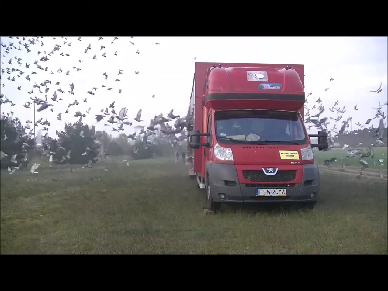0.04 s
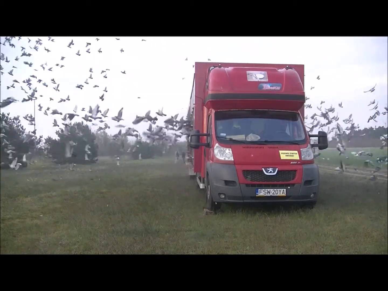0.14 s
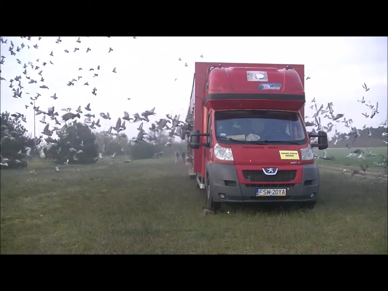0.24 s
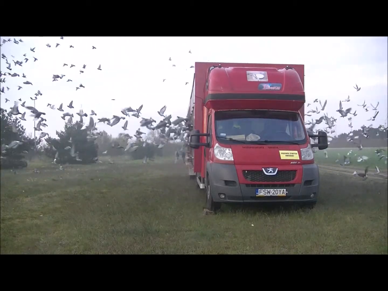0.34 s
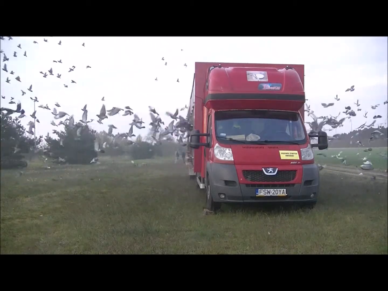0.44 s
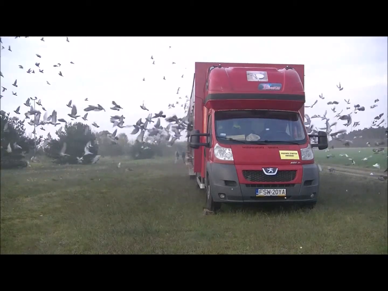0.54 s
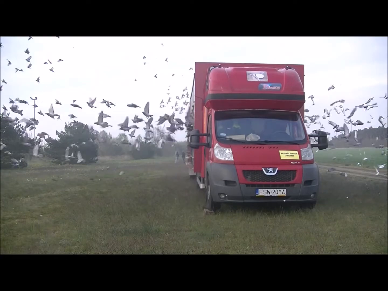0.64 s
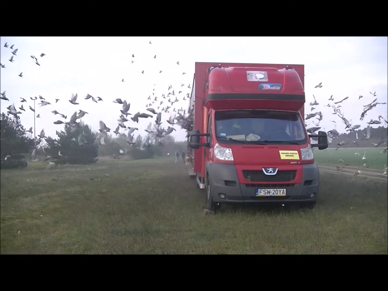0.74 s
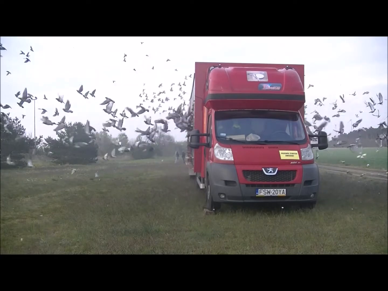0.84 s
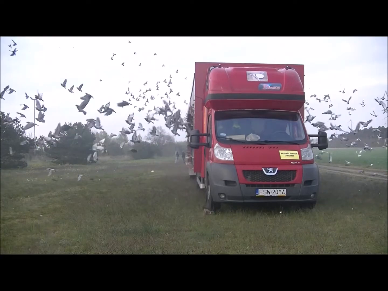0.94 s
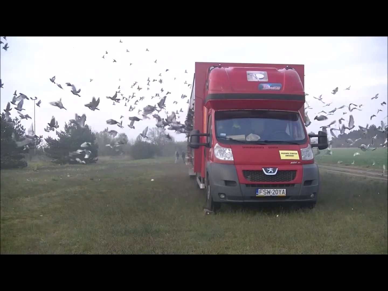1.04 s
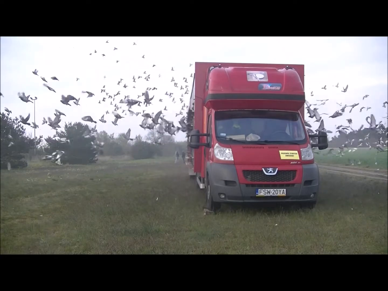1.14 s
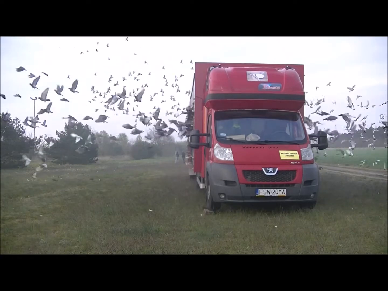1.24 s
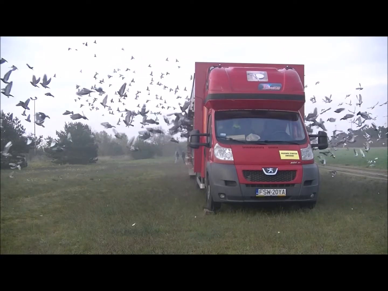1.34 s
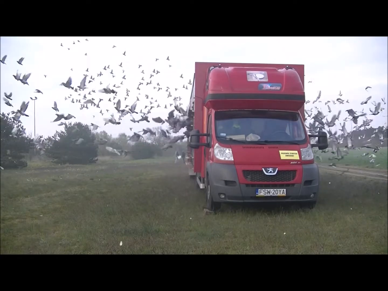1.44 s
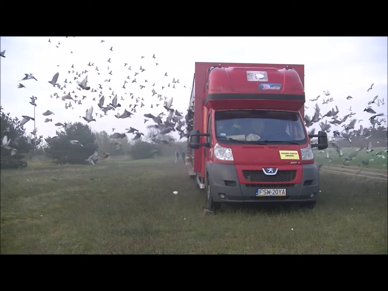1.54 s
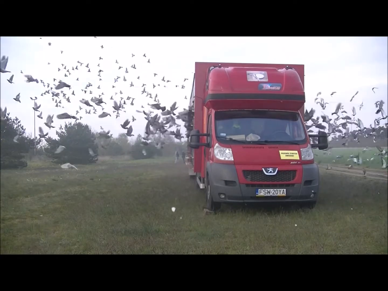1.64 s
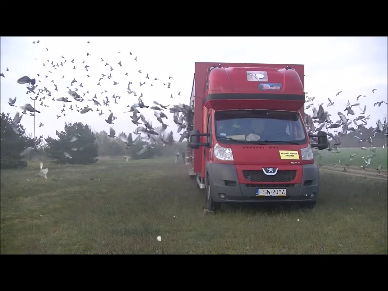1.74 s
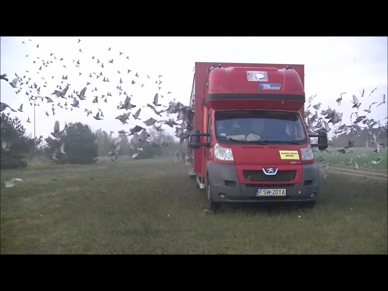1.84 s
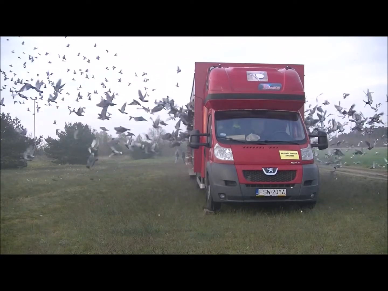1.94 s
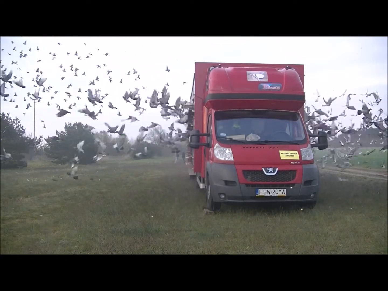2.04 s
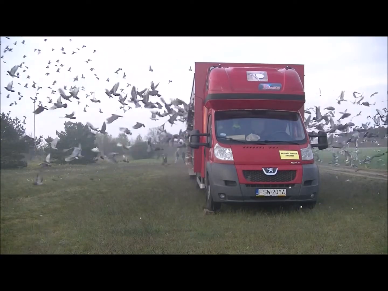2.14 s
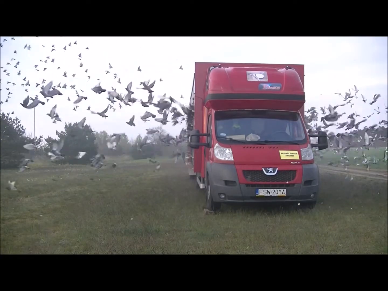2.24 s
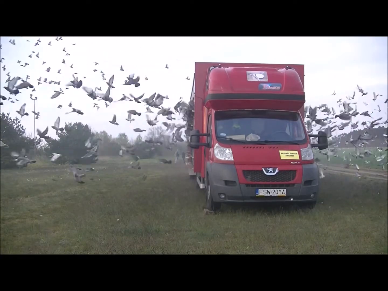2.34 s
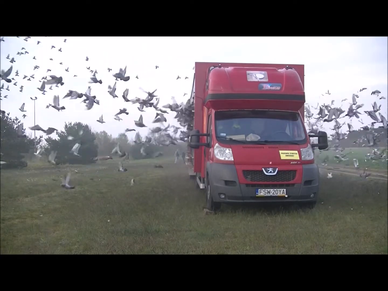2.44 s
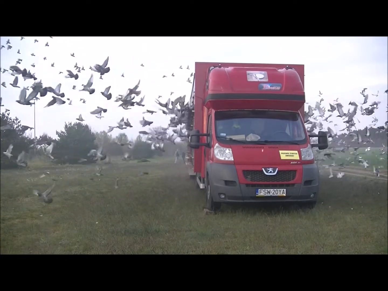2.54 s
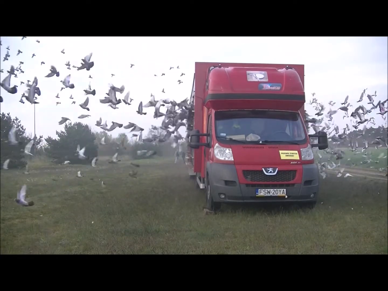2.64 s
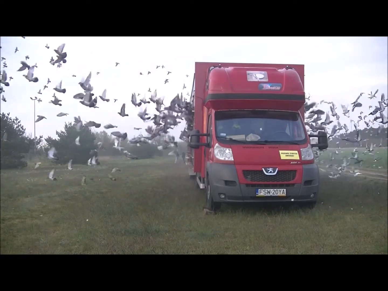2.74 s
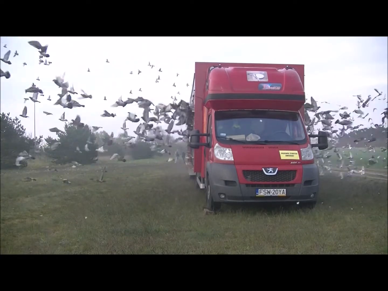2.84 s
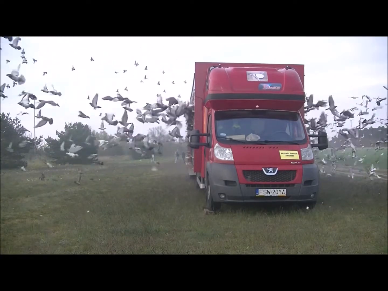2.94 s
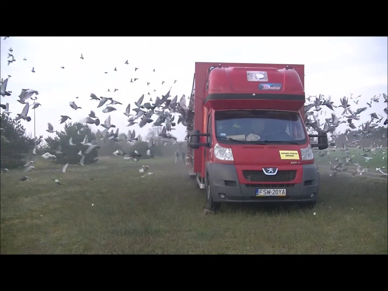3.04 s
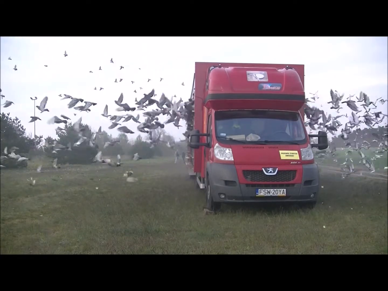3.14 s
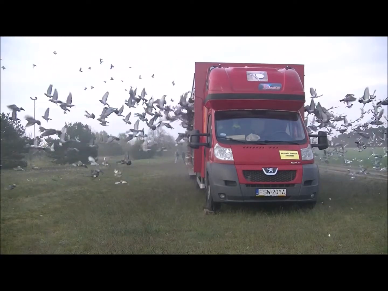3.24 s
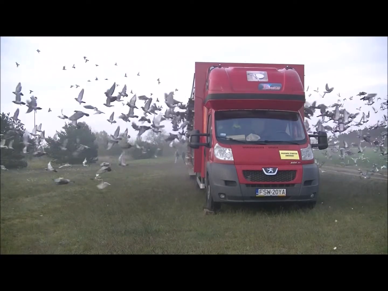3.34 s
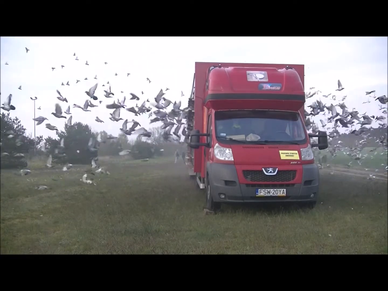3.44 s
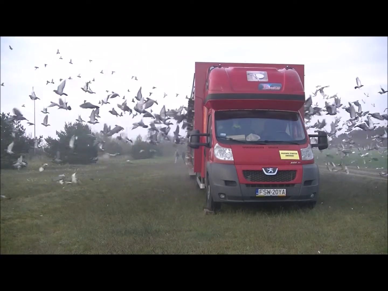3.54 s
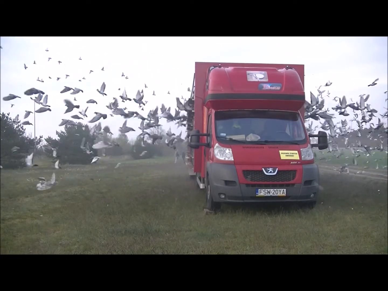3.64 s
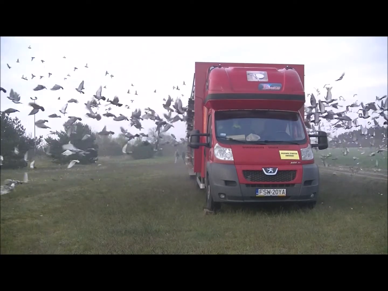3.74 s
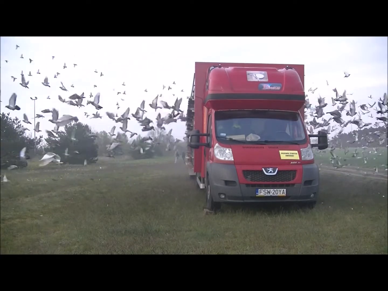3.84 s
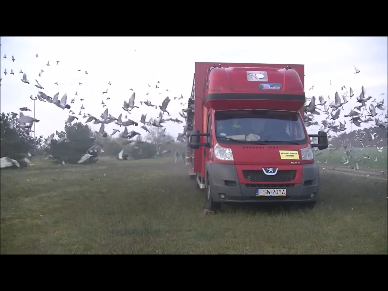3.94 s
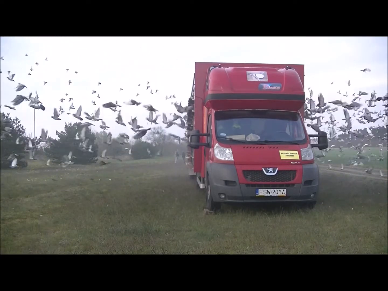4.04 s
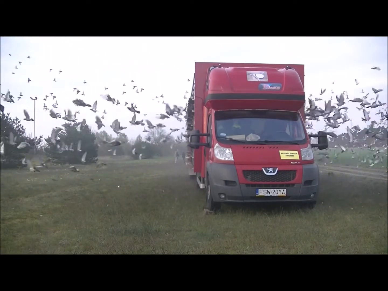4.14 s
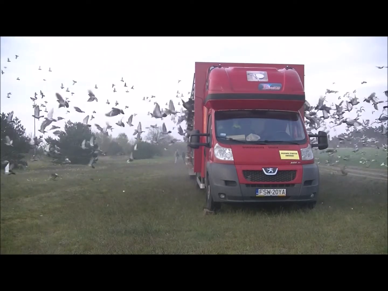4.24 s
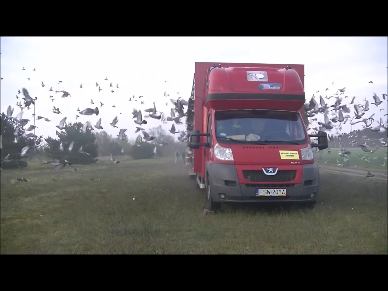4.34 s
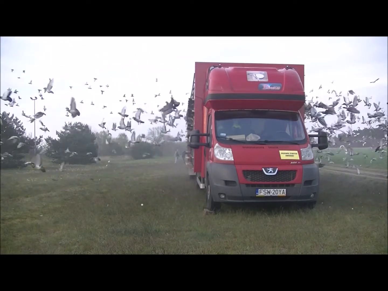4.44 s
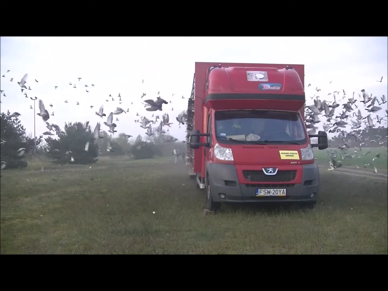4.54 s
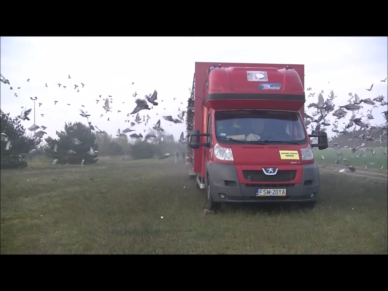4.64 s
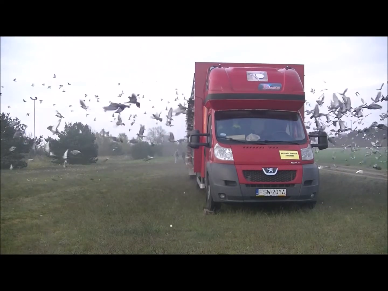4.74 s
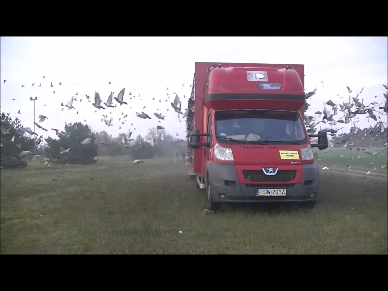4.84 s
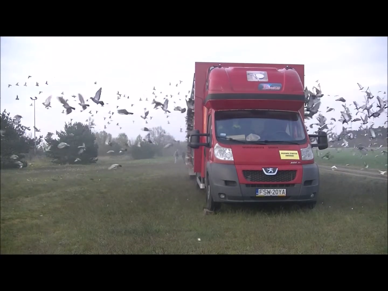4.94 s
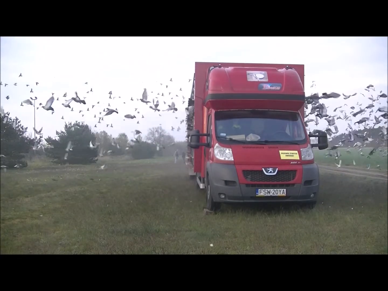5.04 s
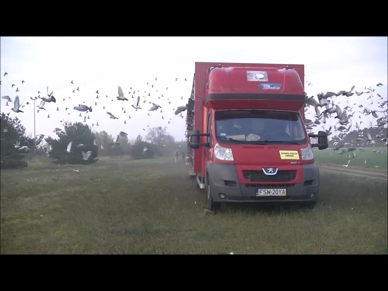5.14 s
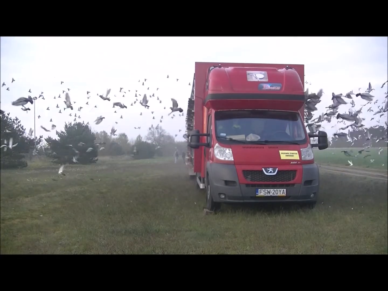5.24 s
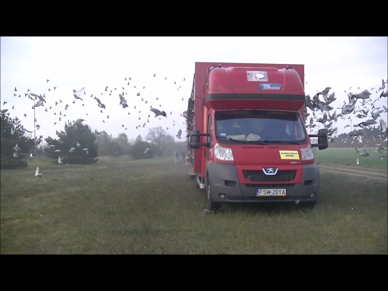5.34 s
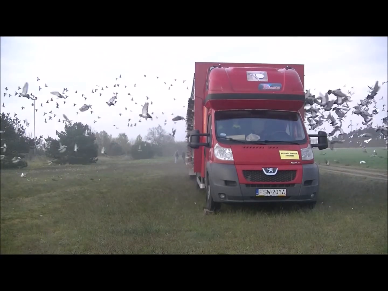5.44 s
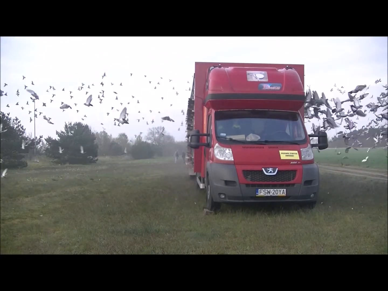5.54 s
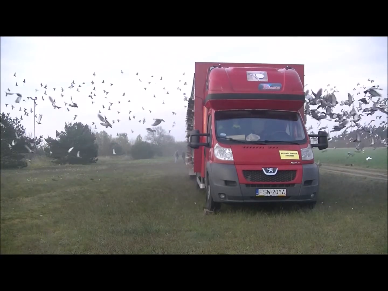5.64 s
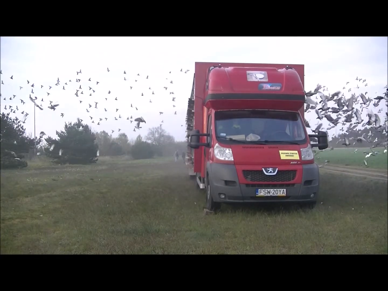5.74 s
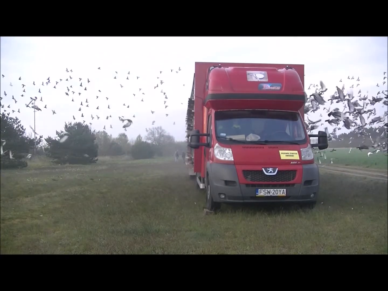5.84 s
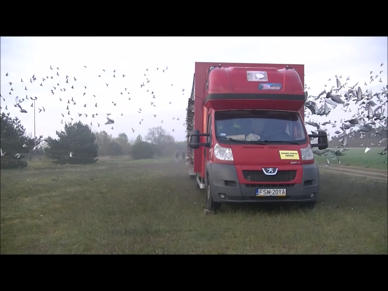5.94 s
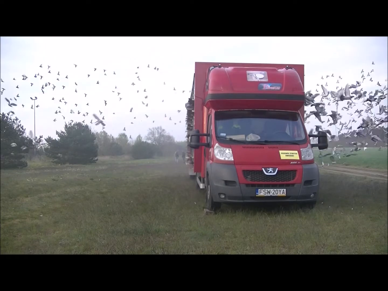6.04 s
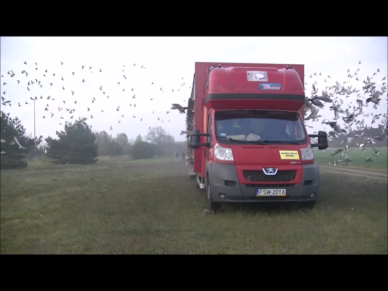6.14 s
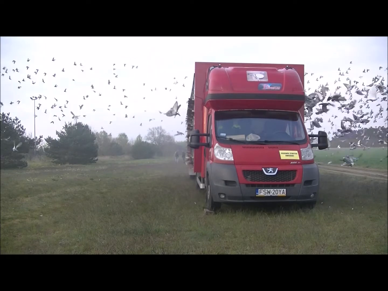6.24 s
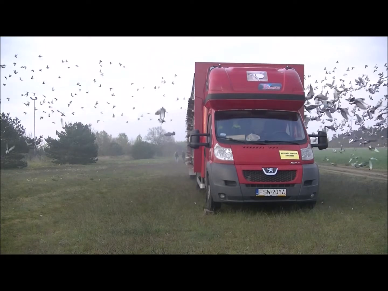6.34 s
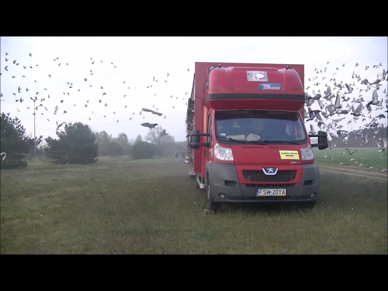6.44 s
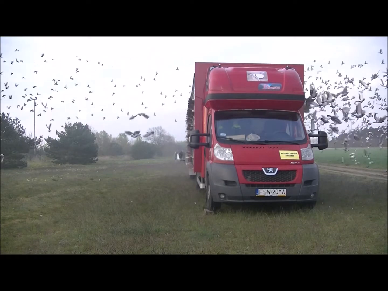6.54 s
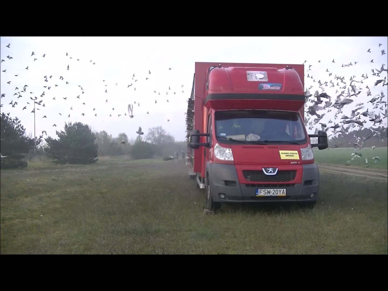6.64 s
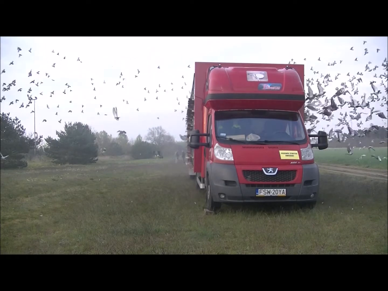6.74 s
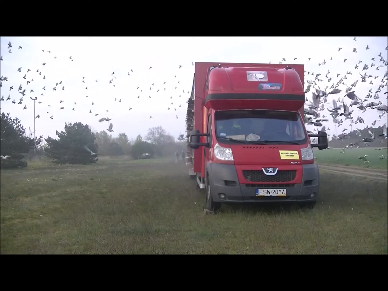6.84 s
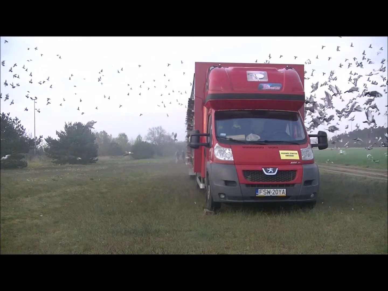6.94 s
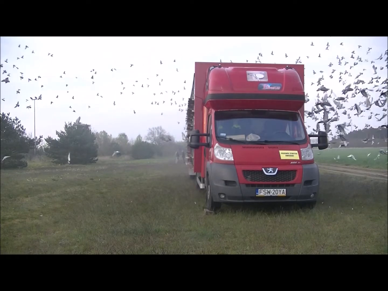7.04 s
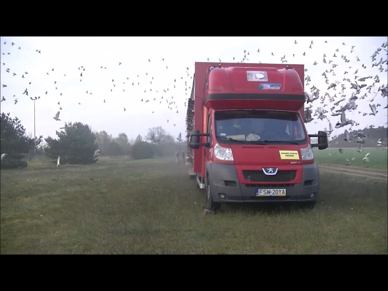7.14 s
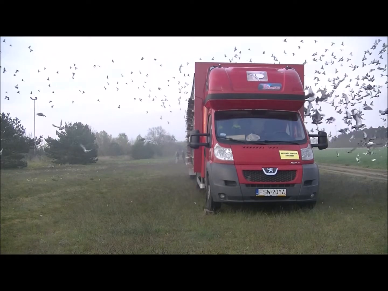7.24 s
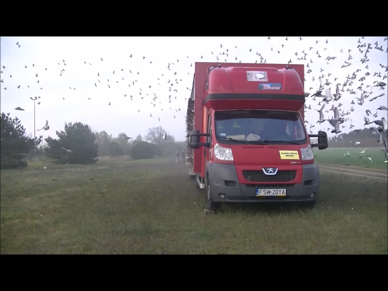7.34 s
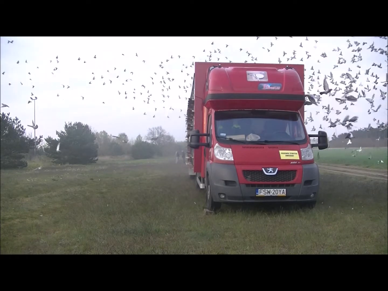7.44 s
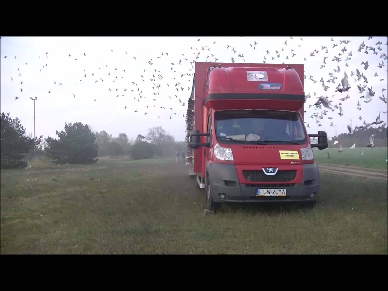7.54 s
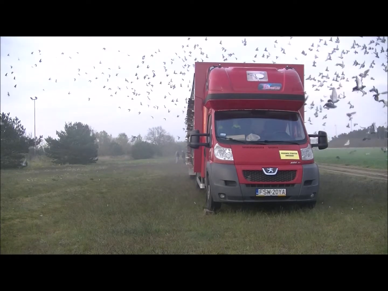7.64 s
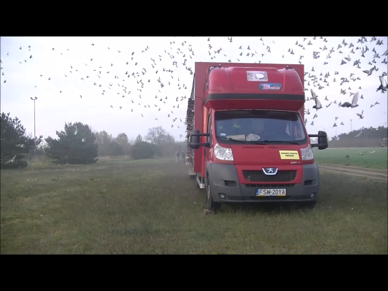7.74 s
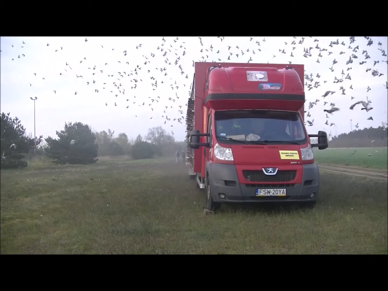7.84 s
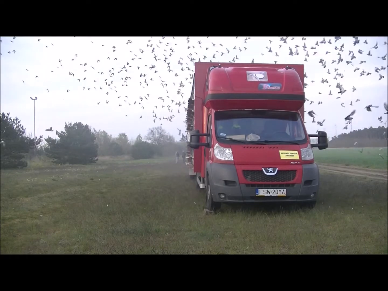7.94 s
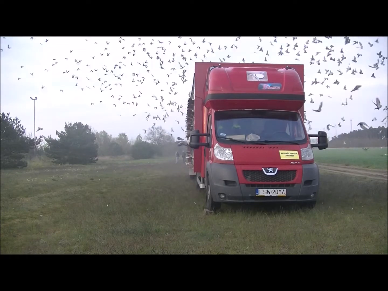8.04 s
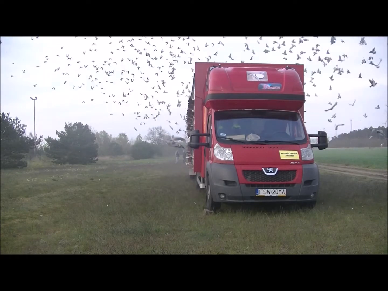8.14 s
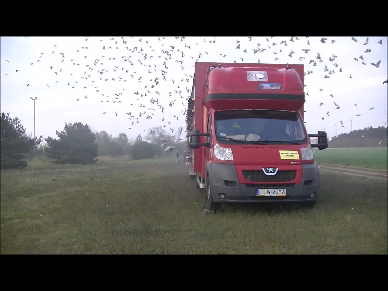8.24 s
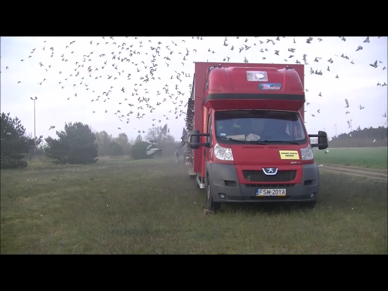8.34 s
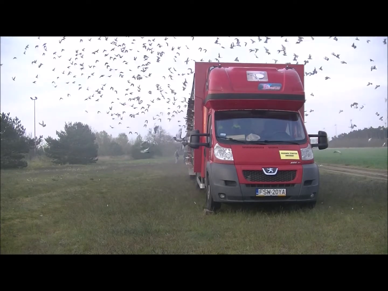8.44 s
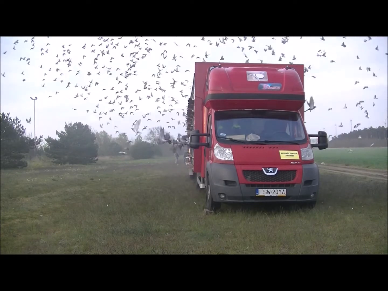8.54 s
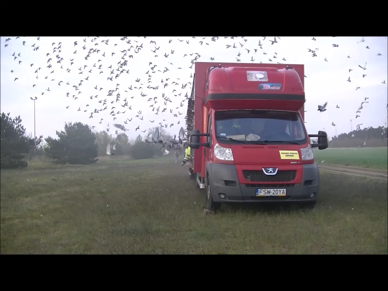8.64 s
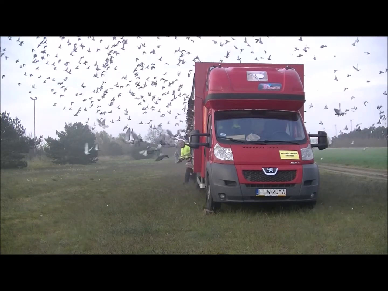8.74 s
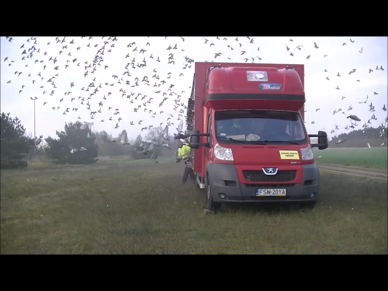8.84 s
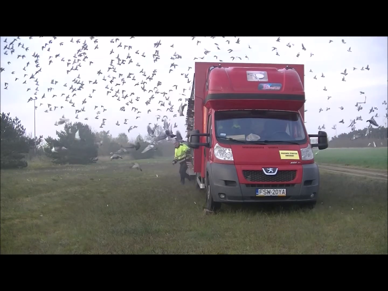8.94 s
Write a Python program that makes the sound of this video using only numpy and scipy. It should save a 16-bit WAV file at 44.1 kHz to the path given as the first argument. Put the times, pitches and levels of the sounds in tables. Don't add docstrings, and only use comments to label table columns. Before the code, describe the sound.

Mass pigeon take-off heard close in open air: a thick, fluttering rush of wings with many dry, bright slaps, spread across the stereo image. The density peaks early, then drops to a second, lighter wave and finally scattered single strokes over a receding patter. Irregular double clicks ring briefly on the camera's metal and case, with faint low tube notes, soft gusts of low air and one tiny creak.

```python
import sys
import numpy as np
from scipy import signal
from scipy.fft import rfft, irfft, next_fast_len
from scipy.io import wavfile
from scipy.ndimage import uniform_filter1d

SR = 44100
rng = np.random.default_rng(int(sys.argv[2]) if len(sys.argv) > 2 else 0)


def generate_wav(signal):
    frames = np.transpose(np.atleast_2d(signal))
    scaled = np.clip(frames, -1, 1) * 32767
    pcm = np.round(scaled).astype(np.int16)
    wavfile.write(sys.argv[1], SR, pcm)


def gain_from_decibels(decibels):
    exponent = np.asarray(decibels, float) / 20
    return 10 ** exponent


N = 396018
LONG = next_fast_len(N, real=True)
HZ = np.maximum(np.fft.rfftfreq(LONG, 1 / SR), 1)
MID_SIDE = np.array([[1], [-1]])


def on_axis(table, hz):
    table_hz, value = np.array(table).T
    return np.interp(np.log(hz), np.log(np.maximum(table_hz, 1)), value)


def unit(x):
    return x / np.sqrt(np.mean(x ** 2))


def colour(x, table):
    axis = np.maximum(np.fft.rfftfreq(4096, 1 / SR), 1)
    cepstrum = irfft(np.log(gain_from_decibels(on_axis(table, axis))))
    cepstrum[1:2048] *= 2
    cepstrum[2049:] = 0
    response = irfft(np.exp(rfft(cepstrum)))
    response = response / np.sqrt(np.sum(response ** 2))
    return signal.fftconvolve(x, response[None], axes=1)[:, :N]


def walk(rate):
    k = int(SR / rate)
    steps = np.repeat(rng.standard_normal(N // k + 1), k)[:N]
    return unit(uniform_filter1d(uniform_filter1d(steps, k), k))


def swell(s, db, rise_db_s, hold_s, fade_db_s):
    t = np.arange(N) / SR
    return gain_from_decibels(db - rise_db_s * np.maximum(s - t, 0) - fade_db_s * np.maximum(t - s - hold_s, 0))


def add(out, s, sounds, pan_db, lag):
    start = (s * SR).astype(int)[:, None]
    for side, sign in enumerate((1, -1)):
        at = start + side * lag[:, None] + np.arange(sounds.shape[1])
        panned = sounds * gain_from_decibels(sign * pan_db / 2)[:, None]
        out[side] += np.bincount(np.clip(at, 0, N).ravel(), panned.ravel(), N + 1)[:N]


def clap(hz, decay_s, tint_db, bounce, thin_hz, crisp_db, size=320):
    t, chance = np.arange(size) / SR, rng.random((len(hz), 3))
    decay = decay_s * gain_from_decibels(11.4 * (chance[:, :1] - .5))
    burst = rng.standard_normal((len(hz), size)) * np.exp(-t / decay) / np.sqrt(decay * SR)
    burst[:, 0] += 1.18 * chance[:, 2]
    axis = np.maximum(np.fft.rfftfreq(size, 1 / SR), 1)
    peak = tint_db * np.exp(-(np.log2(axis / hz[:, None]) / 0.44) ** 2)
    tint = gain_from_decibels(peak + crisp_db * np.clip(np.log2(axis / 5000), 0, 1))
    thin = 1j * axis / (thin_hz + 1j * axis)
    grass_delay_s = 0.000593 + 0.00122 * chance[:, 1:2]
    grass = 1 + bounce * np.exp(-2j * np.pi * axis * grass_delay_s)
    return irfft(rfft(burst) * tint * thin * grass, size)


# (time [s], peak level [dB], strongest #
# frequency [Hz])
WING_CLAPS = [(0.0034, -3, 4120), (0.168, -6, 5000), (0.2887, -7, 5050), (0.4302, -7.5, 5200),
              (0.5033, -5, 1500), (0.8345, -10, 4520), (1.1618, -4, 5130), (1.1686, -4, 5010),
              (1.2817, -6.5, 4290), (1.484, -5, 5040), (1.8821, -4.5, 4890), (2.1999, -2, 4000),
              (2.6548, -11, 5370), (2.8123, -3, 4820), (3.2509, -5.5, 4540), (3.271, -7, 5100),
              (3.3832, -7, 4410), (3.5024, -5, 5080), (3.7758, -4, 4340), (0.4562, -7, 5000),
              (2.33, -9, 5000), (2.5411, -11, 4770), (2.99, -7.5, 4530), (3.036, -7.5, 4560),
              (3.4531, -7.5, 5250), (3.5364, -8, 4650), (3.841, -8.5, 5160), (3.9834, -8.5, 5080),
              (4.422, -9, 4960), (4.5216, -8, 4980),
              (4.7513, -11, 4840), (4.772, -11, 4470), (4.8474, -13, 5160), (5.054, -16, 4800),
                     (5.0787, -15, 5220), (5.0962, -8, 4830), (5.2218, -9, 4760), (5.3166, -17, 4140),
                     (5.342, -4, 5500), (5.4824, -10.5, 3580), (5.5893, -9.5, 4400), (5.7155, -12, 5270),
                     (5.8095, -16, 4140), (5.834, -12, 4960), (5.9662, -13, 5170), (6.024, -15, 4440),
                     (6.1234, -11.5, 4340), (6.1505, -12, 4490), (6.191, -10.5, 4800), (6.272, -8.5, 5260),
                     (6.319, -10.5, 4410), (6.3882, -10.5, 4200), (6.395, -14, 4580), (6.4504, -9, 5400),
                     (6.566, -5, 4440), (6.6935, -8.5, 5200), (6.8302, -8, 4590), (6.8687, -9.5, 4820),
                     (6.953, -10, 4570), (6.9826, -6.5, 4900),
              (7.285, -14.5, 5100), (7.3403, -10, 4600), (7.373, -9.5, 5160), (7.4523, -6.5, 5060),
              (7.5089, -7.5, 5110), (7.616, -7.5, 4880), (7.6374, -14, 4440), (7.6786, -10.5, 4960),
              (7.7194, -14.5, 4910), (7.774, -10, 4500), (7.833, -20, 4740), (7.8918, -16.5, 5100),
              (7.907, -12, 5080), (7.949, -17, 4860), (8.0091, -14.5, 5530), (8.026, -9.5, 5160),
              (8.0706, -13.5, 5150), (8.1837, -8, 3740), (8.3412, -11, 2950), (8.4142, -12.5, 4530),
              (8.441, -16, 4300), (8.45, -8.5, 4200), (8.5614, -11.5, 4550), (8.582, -16, 5100),
              (8.6694, -1.5, 4570), (8.7749, -6, 4480), (8.845, -8.5, 3070), (8.8663, -15, 4920),
              (8.8824, -13, 4940), (8.9686, -9.5, 4840)]
# (time [s], metal level [dB], tube level [dB], case level [dB], body level [dB])
STAND_TAPS = [(0.8688, -53, -50, -38, -42), (2.379, -34, -54, -25, -28), (3.0031, -20, -43.5, -22, -16.5),
              (3.6266, -28.5, -51, -31, -31), (4.2443, -40, -52, -37, -41), (4.8687, -19, -32, -23, -18),
              (5.1788, -39, -43, -26.5, -30), (6.12, -45, -45, -33, -36), (6.9167, -40, -53, -42, -50),
              (7.1, -36, -59, -51, -40), (7.6714, -42, -36.5, -23.5, -31), (7.7638, -21, -36.5, -33, -26),
              (8.497, -20.5, -39, -26.5, -28.5)]
# (frequency [Hz], level per Hz [dB])
WING_TONE = [(60, -21), (250, -10), (450, -8.5), (820, -0.5), (1200, -3), (2900, -4.5), (4400, -1.5),
             (5300, -1.5), (6200, -12.5), (7600, -13), (8900, -22.5), (11000, -20.5), (12700, -25),
             (15500, -25)]


def near_claps():
    cracks = [(tap[0], tap[1] + 12.5, 6940) for tap in STAND_TAPS]
    s, peak_db, hz = np.vstack([WING_CLAPS, cracks, crowd()]).T
    chance = rng.random((len(s), 2)).T
    snap = clap(hz, decay_s=0.00043, tint_db=9.5, bounce=0.79, thin_hz=0.47 * hz[:, None], crisp_db=4.5)
    snap = colour(snap, WING_TONE)
    snap *= (gain_from_decibels(peak_db - 1.0) / np.abs(snap).max(axis=1))[:, None]
    t = np.arange(700) / SR
    slide = np.exp(-((t - .008) / 0.0042) ** 2)
    rustle = colour(rng.standard_normal((len(s), len(t))) * slide, WING_TONE)
    rustle = rustle * gain_from_decibels(peak_db - 25.5 + 6.4 * chance[1])[:, None]
    out, place = np.zeros((2, N)), 2 * chance[0] - 1
    add(out, s + .0015, snap, 2.5 * place, np.round(-.7 * place).astype(int))
    add(out, s - .005, rustle, 2.5 * place, 0 * place.astype(int))
    return out


# (time [s], level [dB])
FLOCK_LEVEL = [(0.0, -27), (2.0, -26), (2.53, -24), (3.02, -27), (3.25, -24), (3.62, -24), (4.22, -26.5),
               (4.5, -25.5), (4.95, -31.5), (5.3, -28.5), (6.13, -30.5), (6.6, -29.5), (7.18, -30.5),
               (8.1, -36.5), (8.38, -36.5), (8.5, -34.5), (8.98, -33)]


def crowd():
    per_s, over_db, spread_db, top_db = 22, 13.5, 4, 16
    thins_s, thin_db, strongest_hz = 7.25, -2, 4860
    chance = rng.random((int(per_s * N / SR), 4)).T
    s = (np.arange(chance.shape[1]) + chance[0]) / per_s
    rise_db = np.minimum(over_db + spread_db * 2 * (chance[1] + chance[2] - 1), top_db)
    rise_db = rise_db + thin_db * (s > thins_s)
    hz = strongest_hz * (1.12 - 0.14 * chance[3] - .5 * chance[3] ** 12)
    return np.transpose([s, np.interp(s, *np.transpose(FLOCK_LEVEL)) + rise_db, hz])


def flock():
    far_hz, far_from_db, far_slope = 8800, -25.5, 0.47
    flock_db = np.interp(np.arange(N) / SR, *np.transpose(FLOCK_LEVEL))
    wings = colour(gain_from_decibels(-2.0) * patter() + gain_from_decibels(-3.5) * rush(), WING_TONE)
    treble = irfft(rfft(wings, LONG) / (1 + (far_hz / HZ) ** 8), LONG)[:, :N]
    wings = wings - treble * (1 - gain_from_decibels(far_slope * np.minimum(flock_db - far_from_db, 0)))
    return gain_from_decibels(flock_db) * wings


def patter(count=2000, size=3):
    stroke = np.repeat(rng.random((count, 3)), size, axis=0).T
    slap = rng.random((count * size, 3)).T
    hz = 900 * 2 ** (3 * slap[0])
    sounds = clap(hz, decay_s=0.00051, tint_db=7.5, bounce=0.63, thin_hz=630, crisp_db=3.0)
    size_db = np.minimum(-1.8 * np.log(stroke[0]) - 1.74 * np.log(slap[1]), 9)
    sounds = sounds * gain_from_decibels(size_db)[:, None]
    out, place = np.zeros((2, N)), 2 * stroke[1] - 1
    s = stroke[2] * N / SR + .015 * slap[2]
    add(out, s, sounds, 6.3 * place, np.round(-.7 * place).astype(int))
    return unit(out)


def rush():
    out, strokes = 0, 0.37 * walk(9) + 0.83 * walk(30)
    noise = rfft(rng.standard_normal((2, LONG)))
    widths = (0.28, 0.2, 0.47, 0.45, 0.34, 0.44, 0.38, 0.74, 0.26)
    for hz, width in zip(61.5 * 2 ** np.arange(9), widths):
        octave = np.cos(np.pi / 2 * np.clip(np.log2(HZ / hz), -1, 1)) ** 2
        mid, side = irfft(noise * octave, LONG)[:, :N]
        flicker = gain_from_decibels(min(hz / 1500, 1) * strokes + 1.0 * walk(18))
        out = out + flicker * (mid + width * side * MID_SIDE)
    return unit(out)


def ring(modes, t, rise_s):
    fade = sum(gain_from_decibels(db - 60 * t / t60) * np.sin(2 * np.pi * hz * t) for hz, db, t60 in modes)
    return fade * (1 - np.exp(-t / rise_s)) * (t > 0)


# (frequency [Hz], level [dB], time to fall 60 dB [s])
TUBE_NOTES = [(179.2, 8, 0.37), (203, 3, 0.25), (120, -23, 0.17), (77, -10, 0.55)]
CASE_NOTES = [(263, 0.5, 0.029), (484, 0.5, 0.037), (602, 3.5, 0.049), (837, -4.5, 0.043)]
BODY_NOTES = [(1216, -5, 0.13), (1316, 5, 0.042), (1500, -5.5, 0.071)]
LENS_NOTES = [(2203, 2, 0.058), (2993, 3, 0.031)]
METAL_NOTES = [(6594, -3, 0.083), (7650, 16, 0.005)]


def taps():
    out, t = np.zeros((2, N)), np.arange(SR // 2) / SR
    for s, metal_db, tube_db, case_db, body_db in STAND_TAPS:
        lens_db = 2 + 0.99 * metal_db + (1 - 0.99) * body_db
        sound = gain_from_decibels(tube_db - 2) * ring(TUBE_NOTES, np.maximum(t - .015, 0), rise_s=0.0033)
        for late_s, db in ((.0008, -1.6), (.0046, -2.1)):
            u = np.maximum(t - late_s, 0)
            rattle = 1 + 0.65 * uniform_filter1d(rng.standard_normal(len(t)), size=9)
            case = gain_from_decibels(case_db) * ring(CASE_NOTES, u, rise_s=0.0013)
            body = gain_from_decibels(body_db + 3) * ring(BODY_NOTES, u, rise_s=0.0023)
            lens = gain_from_decibels(lens_db) * ring(LENS_NOTES, u, rise_s=0.0007)
            metal = gain_from_decibels(metal_db + 2) * ring(METAL_NOTES, u, rise_s=0.00015)
            hiss = uniform_filter1d(rng.standard_normal(len(t)), size=2) * np.exp(-u / 0.002) * (u > 0)
            sound += gain_from_decibels(db) * (rattle * (case + body) + lens + metal)
            sound += gain_from_decibels(db + metal_db + 5) * hiss
        add(out, np.array([s]), sound[None], np.array([4.0]), np.array([0]))
    return out


def sway():
    creak_s, length_s, edge_s = 8.06, 0.11, 0.03
    turn = (np.arange(N) / SR - creak_s) / length_s
    creak_hz = 210 + (500 - 210) * np.clip(turn, 0, 1)
    rock = np.sin(2 * np.pi * np.cumsum(44 * (1 + 0.148 * walk(12))) / SR) * gain_from_decibels(2.5 * walk(8.9))
    strands = 0
    for ratio in (.55, .8, 1.0):
        strand_hz = ratio * creak_hz * (1 + .09 * walk(120))
        strands = strands + np.sin(2 * np.pi * np.cumsum(strand_hz) / SR) * gain_from_decibels(4.1 * walk(90))
    creak_gain = swell(creak_s + edge_s, -44, 12 / edge_s, length_s - edge_s, 20 / edge_s)
    rock_gain = swell(8.13, -49.5, rise_db_s=43, hold_s=.16, fade_db_s=55)
    return rock_gain * rock + creak_gain * strands


# (time [s], peak level [dB], fade [dB per s])
AIR_GUSTS = [
    (2.6, -51, 30),
    (5.05, -59.5, 20),
    (6.36, -60, 42),
    (6.92, -45.5, 250),
    (7.11, -51, 250),
    (7.17, -55, 250),
    (8.0, -55, 12),
]
# (frequency [Hz], level per Hz [dB])
AIR_TONE = [(21, -63), (35, -10.5), (144, -4), (177, -8), (226, -8), (258, -4), (400, -5.5), (520, -39),
            (880, -120)]


def low_air():
    breeze = gain_from_decibels(-70.5) + sum(swell(s, db, 2.2 * fade, 0, fade) for s, db, fade in AIR_GUSTS)
    mid, side = rng.standard_normal((2, N))
    air = unit(colour(mid + 1.03 * side * MID_SIDE, AIR_TONE)) * gain_from_decibels(2.5 * walk(6.7))
    return gain_from_decibels(7.0) * breeze * air


def scene():
    return near_claps() + flock() + taps() + sway() + low_air()


def low_pass(x):
    return signal.sosfilt(signal.butter(12, 16880, fs=SR, output="sos"), x)


# (frequency [Hz], left minus right level [dB])
PORT_COLOUR = [(60, -2), (110, -2), (200, -4), (380, -6), (700, -6), (1290, -3.0), (2380, -2.5), (4400, -3),
               (8120, 2.5), (15000, -1.5)]
# (frequency [Hz], lead of the left [radians])
PORT_PHASE = [(60, 0), (780, .5), (3100, .2), (3800, .6), (4900, .4), (5900, .8), (6900, .1), (7400, -.8),
              (8300, -2), (9600, 0), (16500, 0)]


def record(dry):
    left_over_right = gain_from_decibels(on_axis(PORT_COLOUR, HZ)) * np.exp(1j * on_axis(PORT_PHASE, HZ))
    ports = left_over_right ** np.array([[.5], [-.5]])
    ports = ports * gain_from_decibels(-34 * (HZ > 15900))
    mix = np.clip(irfft(rfft(dry, LONG) * ports, LONG)[:, :N], -1, 1)
    return low_pass(mix)


dry = scene()
out = record(dry)
generate_wav(out)
```